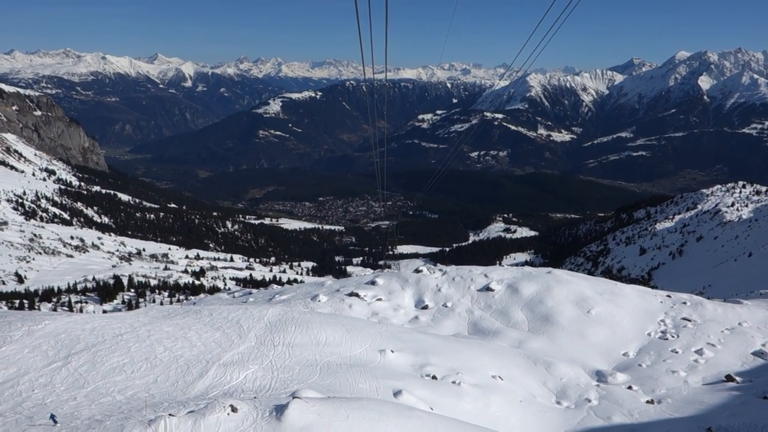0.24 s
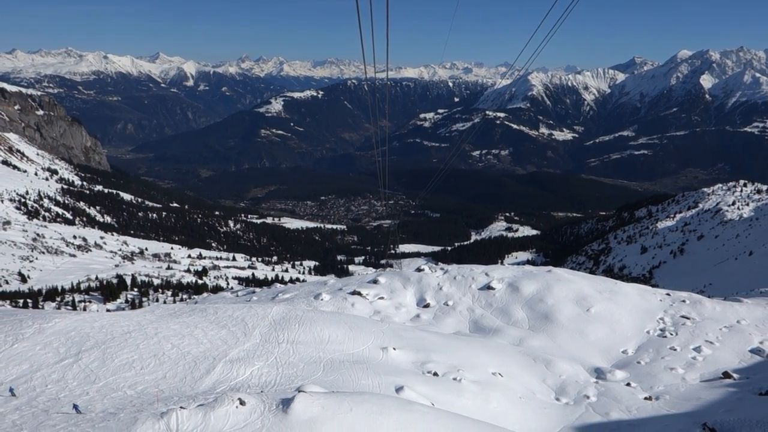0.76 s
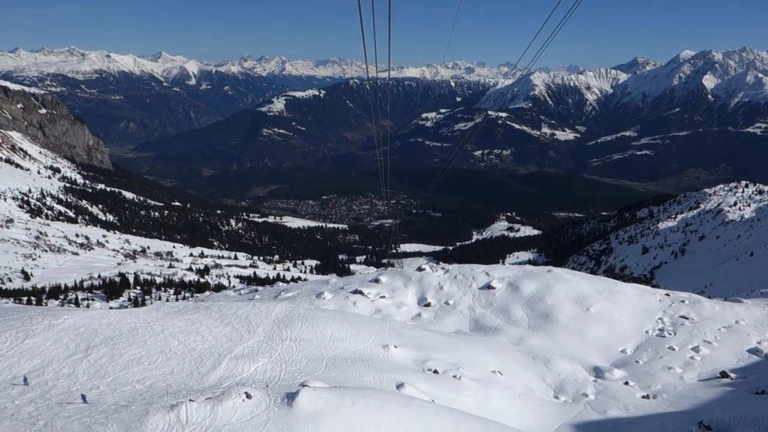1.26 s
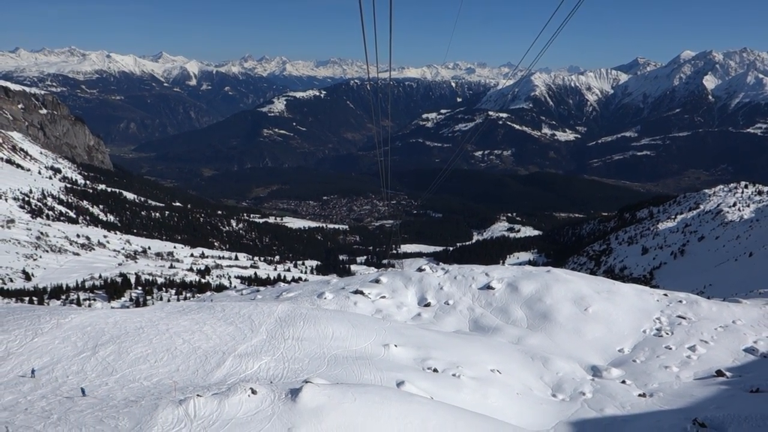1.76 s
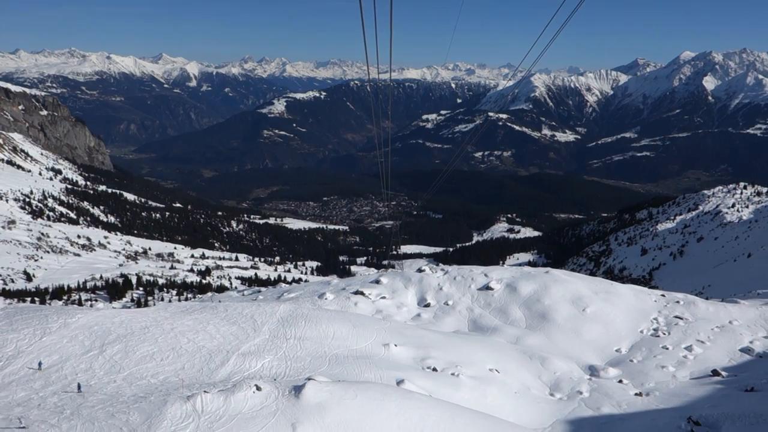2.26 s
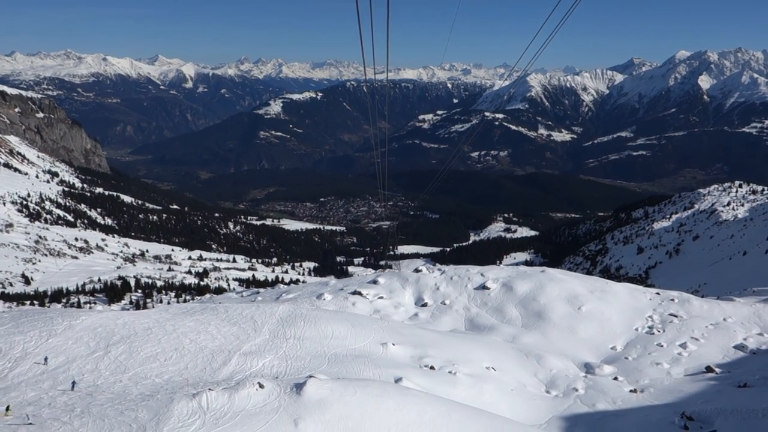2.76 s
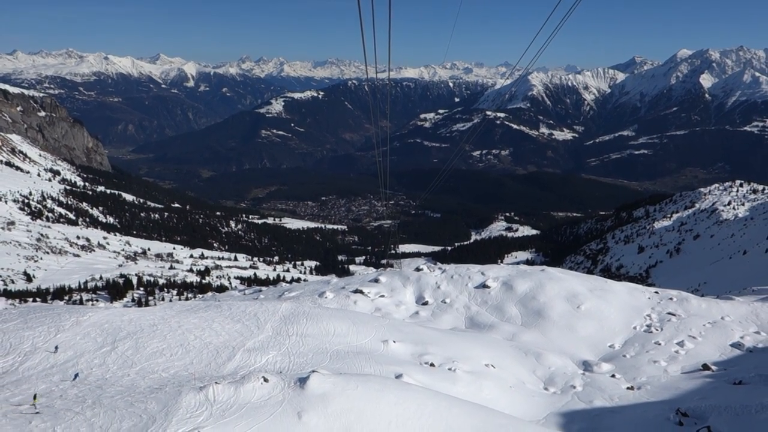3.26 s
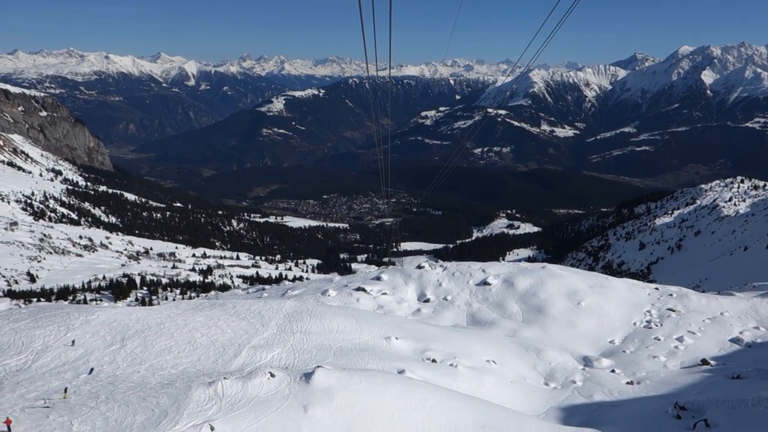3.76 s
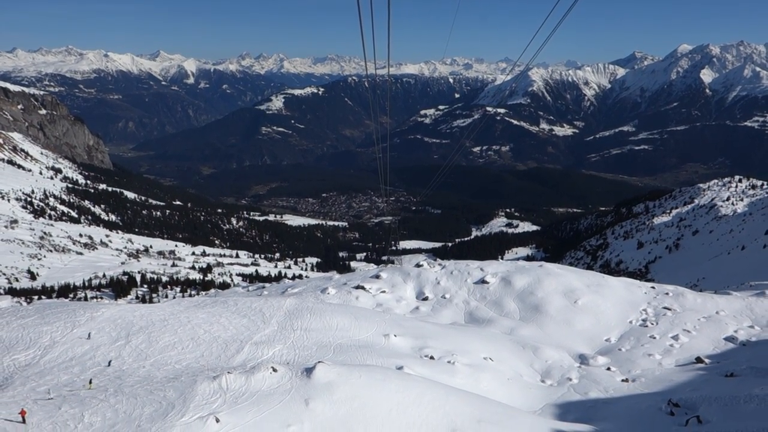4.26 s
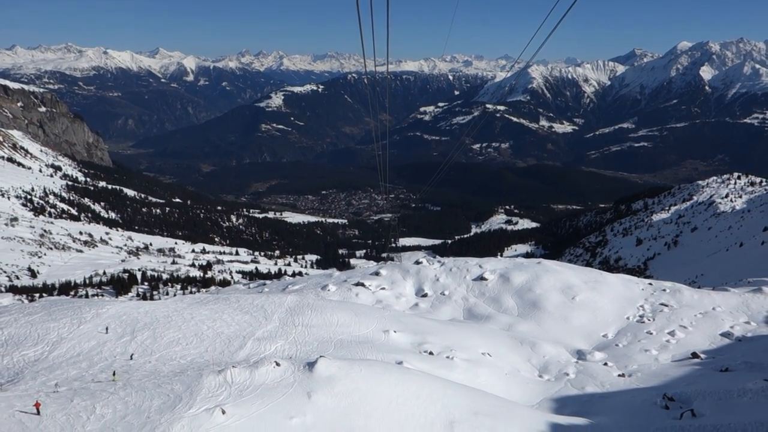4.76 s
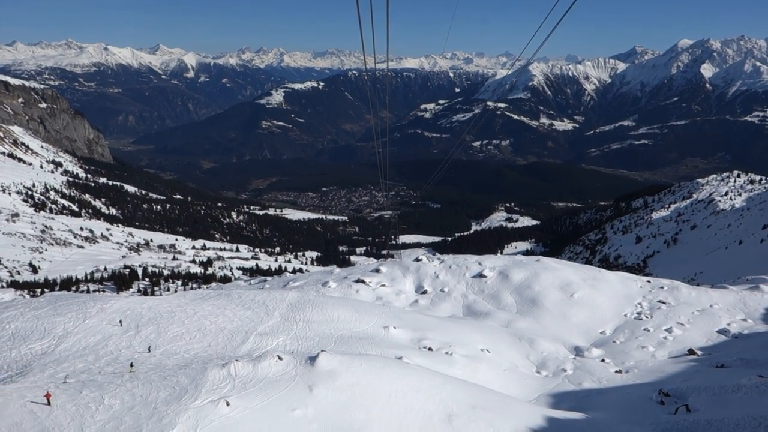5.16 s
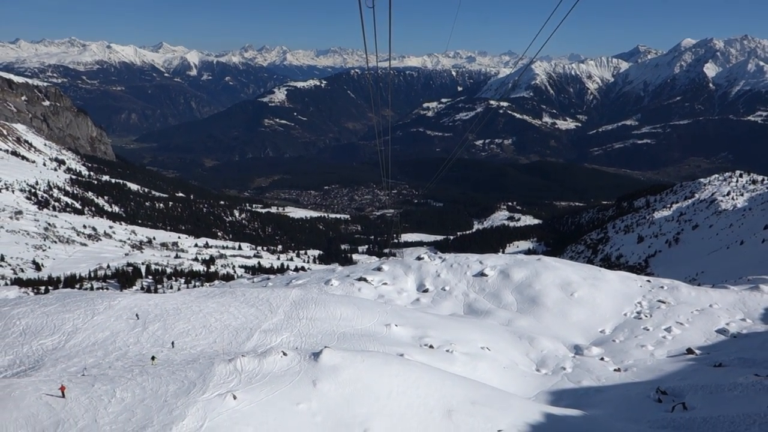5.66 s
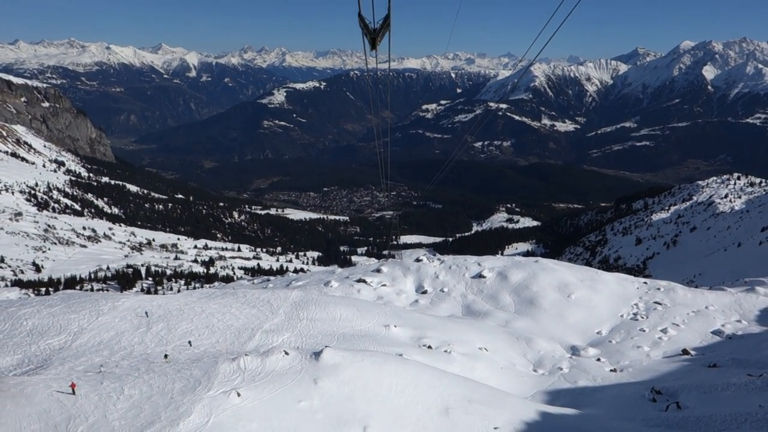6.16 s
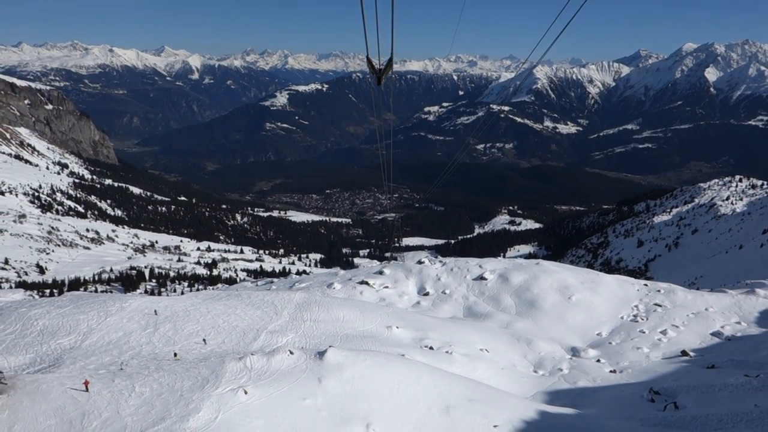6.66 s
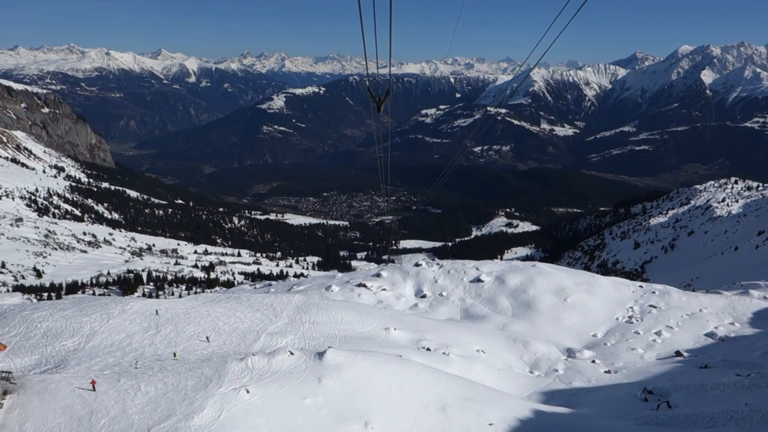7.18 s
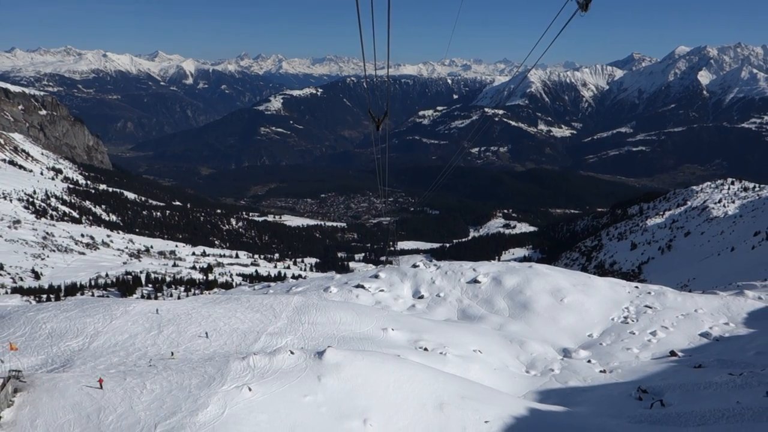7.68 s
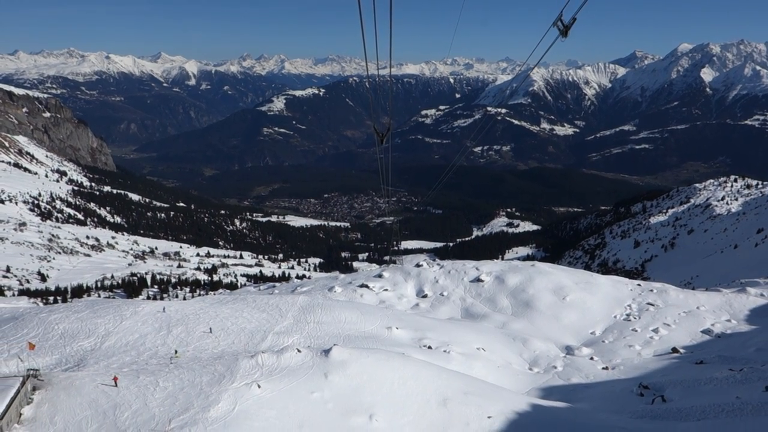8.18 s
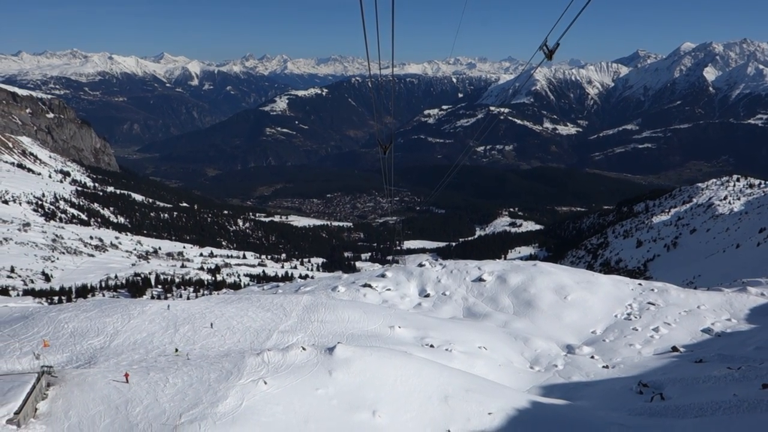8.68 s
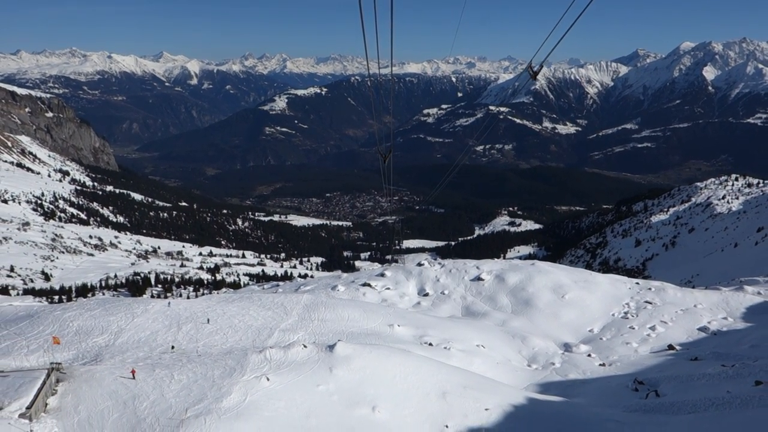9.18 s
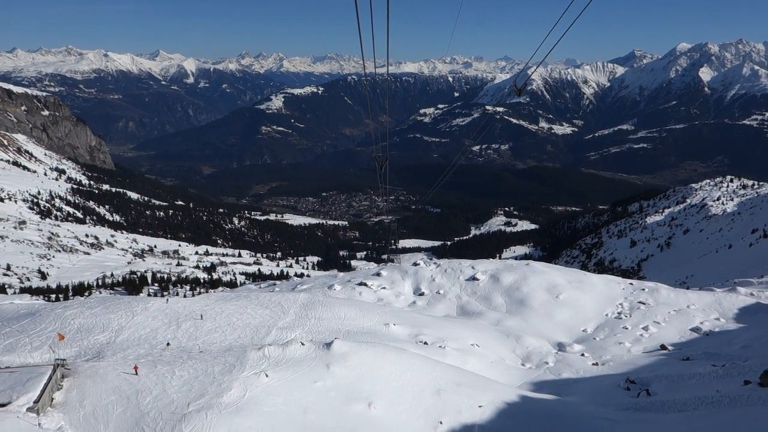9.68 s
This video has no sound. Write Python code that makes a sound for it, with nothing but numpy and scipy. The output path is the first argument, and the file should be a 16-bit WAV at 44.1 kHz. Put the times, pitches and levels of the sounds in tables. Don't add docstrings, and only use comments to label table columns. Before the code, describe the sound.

Close stereo microphones in a small enclosed cabin gliding on ropes. A dark rumble of shell and floor dominates, with quiet airy hiss from a window gap at left, occasionally ringing as wheels rub. Small plastic ticks on the right, a sharp snap on the left past six seconds. Later the low wavering drone strengthens and padded thuds come in groups, strongest at eight seconds, with one last bump near the end.

```python
import sys
import numpy as np
from scipy import signal
from scipy.fft import rfft, irfft, next_fast_len
from scipy.io import wavfile
from scipy.ndimage import uniform_filter1d, map_coordinates

SR = 44100
rng = np.random.default_rng(int(sys.argv[2]) if len(sys.argv) > 2 else 0)


def attenuation_scalar(level_db):
    decades = np.asarray(level_db, float) / 20
    return 10 ** decades


def inscribe(sig):
    pcm = np.round(np.clip(np.atleast_2d(sig).T, -1, 1) * 32767)
    wavfile.write(sys.argv[1], SR, pcm.astype(np.int16))


N = 437913
T = np.arange(N) / SR


def unit(x):
    return x / np.sqrt(np.mean(x ** 2) + 1e-20)


def along(points, hz):
    point_hz, value = np.transpose(points)
    return np.interp(np.log(hz + 1), np.log(point_hz + 1), value)


def curves(rows):
    s, *columns = np.transpose(rows)
    return [np.interp(T, s, column) for column in columns]


def wobble(knots_per_s):
    knots = rng.standard_normal(int(N * 40 / SR) + 4)
    coarse = map_coordinates(knots, [T[::64] * min(knots_per_s, 40)])
    return np.interp(T, T[::64], coarse)


def bell(t, length_s):
    return np.exp(-(2 * t / length_s) ** 2)


def filtered(x, response):
    m = next_fast_len(N + SR // 2)
    return irfft(rfft(x, m) * response(np.fft.rfftfreq(m, 1 / SR)), m)[..., :N]


def modes(table):
    def response(f):
        total = 0
        for k, (hz, width_hz, db) in enumerate(table):
            total = total + (-1) ** k * attenuation_scalar(db) * 1j * f * width_hz / (hz * hz - f * f + 1j * f * width_hz)
        return total
    return response


def ringing(noise, hz, width_hz):
    b, a = signal.iirpeak(hz, hz / width_hz, SR)
    return unit(signal.lfilter(b, a, signal.lfilter(b, a, noise)))


def rush(spectrum, patchy_db):
    shape = (513, N // 512 + 3)
    patches = uniform_filter1d(rng.standard_normal(shape), size=12, axis=0)
    patches = uniform_filter1d(patches, size=7, axis=1)
    colour_db = along(spectrum, np.fft.rfftfreq(1024, 1 / SR))[:, None]
    z = signal.stft(rng.standard_normal(N + 1024), nperseg=1024)[2][:, :shape[1]]
    z = z * attenuation_scalar(colour_db + patchy_db * unit(patches))
    return unit(signal.istft(z, nperseg=1024)[1][:N])


def add(track, s, sound):
    part = track[round(s * SR):][:len(sound)]
    part += sound[:len(part)]


def ports(x, left_db):
    lag = 4
    late = np.pad(x, (lag, 0), "edge")[:N]
    return np.array([attenuation_scalar(left_db / 2) * late, attenuation_scalar(-left_db / 2) * x])


def drum(table, top_hz):
    def response(f):
        return modes(table)(f) * f * f / (f * f + 17 ** 2) / (1 + (f / top_hz) ** 4)
    return unit(filtered(rng.standard_normal((2, N)), response))


def shell():
    # time in seconds, drive in dB.
    roughness = [(0, -35), (.4, -36.5), (.95, -33.5), (1.55, -35), (2.1, -31), (2.5, -35), (2.85, -34.5),
                 (3.4, -33.5), (4.2, -31), (4.5, -35.5), (4.8, -35), (5.8, -33), (6.15, -35), (7.25, -33),
                 (7.8, -34.5), (8.7, -32), (9.3, -34), (9.93, -35.5)]
    # frequency in Hz, width in Hz, level in dB.
    shell_modes = [(126, 11.5, -5), (141, 10.8, 0), (160.5, 13.6, 1), (181, 10, -2), (193, 10, -5),
                   (229.3, 14, -11), (242, 34, -22.5)]
    frame_modes = [(30.4, 11, 0), (50, 11, -1.5), (65.5, 8.6, 2.5), (98.1, 5.2, 4)]
    # centre in seconds, gain in dB, length in seconds.
    swings = [(.3, 5, 0.61), (.85, 4.5, 0.2), (1.85, 2, .3), (2.65, 3.5, 0.86), (3.443, 11, 0.43),
              (3.753, -0.5, .2), (5.1, 7.5, 0.43), (5.795, 1, .4), (6.872, 7.5, .35), (7.298, 3.5, 0.57),
              (8.35, 7, 0.48), (9.4, 4, 0.31)]
    rest_db = -41
    boom_db, = curves(roughness)
    sway_db = rest_db + sum(db * bell(T - s, length_s) for s, db, length_s in swings)
    boom, sway = drum(shell_modes, top_hz=325), drum(frame_modes, top_hz=150)
    boom = ports(boom[0], left_db=1.0) + attenuation_scalar(-21.5) * boom[1] * [[1], [-1]]
    sway = ports(sway[0], left_db=0.0) + attenuation_scalar(-19.5) * sway[1] * [[1], [-1]]
    return attenuation_scalar(boom_db + 3.0) * boom + attenuation_scalar(sway_db + 2.0) * sway


def hum():
    # time in seconds, pitch in Hz, level in dB.
    strand_tone = [(0, 181, -41.5), (3, 181, -37), (5.2, 181, -41), (5.65, 180, -32.5), (6.1, 181, -31.5),
                   (6.57, 181.2, -26.5), (6.86, 181.2, -29.5), (7.1, 181.6, -24), (7.7, 181.9, -25.5),
                   (8.15, 182, -25), (8.4, 182.5, -21), (9, 181.4, -24), (9.3, 182.7, -24),
                   (9.62, 182.8, -26.5), (9.83, 186.4, -21.5), (9.93, 183.5, -23)]
    # time in seconds, level change in dB.
    skips = [(5.78, -10), (5.87, -6), (6.24, -19), (6.51, -9.5), (6.8, -11), (7.76, -5), (8.08, -6),
             (8.17, -4), (8.459, -10.5), (8.67, -5), (9.01, -11.5), (9.47, -7), (9.77, 1)]
    skip_s = 0.028
    hz, db = curves(strand_tone)
    db = db + sum(change_db * bell(T - s, skip_s) for s, change_db in skips)
    phase = 2 * np.pi * np.cumsum(hz) / SR + 0.29 * wobble(7)
    waver_db = 1.2 * wobble(22) + 1.3 * wobble(8)
    tone = np.sqrt(2) * attenuation_scalar(db + waver_db) * np.sin(phase)
    return ports(tone, left_db=3.0) * attenuation_scalar(0.66 * wobble(9.6) * [[1], [-1]])


def window_gap():
    # time in seconds, flow in dB.
    draught = [(0, -59.5), (.92, -61), (1.05, -59.5), (1.65, -58), (1.9, -60), (2.3, -58.5), (2.85, -58.5),
               (3.5, -60), (3.9, -61), (4.8, -59.5), (5.6, -59.5), (6.4, -59), (7.3, -58), (7.7, -58.5),
               (8.3, -59), (8.55, -56.5), (8.9, -60), (9.93, -60)]
    # frequency in Hz, level in dB per Hz.
    roar_spectrum = [(150, -41), (230, -4.5), (383, -3.5), (500, -5.5), (590, -12.5), (655, -12.5),
                     (760, -20), (1000, -44.5), (2000, -120)]
    leak_spectrum = [(450, -41.5), (750, -2.5), (900, 2), (1290, 0.5), (1700, -1.5), (2300, -4.5),
                     (2700, -15.5), (3600, -27), (6600, -120)]
    fizz_spectrum = [(2000, -120), (2600, 2), (3800, 1), (5200, -4), (7000, -3), (10000, -11.5),
                     (14000, -17)]
    shade_spectrum = [(150, -29.5), (230, 0.5), (330, -5), (450, -14.5), (560, -25.5), (800, -28),
                      (1200, -36.5), (2200, -44.5), (3500, -57.5), (6000, -120)]
    # frequency in Hz, width in
    # Hz, level in dB.
    pane_lines = [(654, 38, 0), (940, 14, -3), (1580, 47, -1.5), (1755, 56, 0.5), (2470, 50, 0.5),
                  (3600, 120, -0.5), (4420, 35, 0)]
    # frequency in Hz, level in dB.
    right_share = [(230, -4), (330, -7.5), (450, -15.5), (650, -23.5), (1000, -26), (2000, -24.5),
                   (4000, -20.5)]
    # frequency in Hz, phase in radians.
    right_lead = [(200, .7), (450, .85), (650, 1.4), (900, 2.1), (1150, 2.45), (16000, 2.5)]
    leak_db, = curves(draught)
    gust_db = leak_db - leak_db.mean()
    roar_db = -47 + 0.73 * gust_db + 0.6 * wobble(7.8)
    fizz_db = -64.5 + 1.6 * gust_db - 0.92 * T + 0.8 * wobble(2.5)
    air = attenuation_scalar(roar_db + 6.0) * rush(roar_spectrum, patchy_db=0.56)
    air += attenuation_scalar(leak_db + 6.0 + 0.92 * wobble(8)) * rush(leak_spectrum, patchy_db=0.7)
    air += attenuation_scalar(fizz_db + 4.5) * rush(fizz_spectrum, patchy_db=2.0)

    def to_ports(f):
        whistling = np.sqrt(1 + sum(abs(modes([tone])(f)) ** 2 for tone in pane_lines))
        across = attenuation_scalar(along(right_share, f)) * np.exp(1j * along(right_lead, f))
        return whistling * np.array([1 + 0 * f, across])

    left, right = filtered(air + wheels(), to_ports)
    return np.array([left, right + attenuation_scalar(roar_db - 4.5) * rush(shade_spectrum, patchy_db=2.0)])


def wheels():
    # centre in seconds, length in seconds, level in dB, brightness in dB per octave.
    rubs = [(2.2, 0.26, -66.5, -5), (2.5, 0.18, -69, 2), (2.778, 0.31, -63.5, 1.5), (3.361, 0.18, -64, 0.5),
            (3.553, 0.22, -66.5, 3.5), (4.655, 0.16, -66.5, 3), (5.6, 0.14, -68.5, 7),
            (5.804, 0.13, -66, -3), (6.462, 0.15, -65, 1.5), (7.15, 0.09, -71.5, -10.5),
            (7.8, 0.11, -74, 10.5), (8.57, 0.19, -64, -11.5), (8.95, 0.13, -68, 6)]
    # frequency in Hz, width in Hz, level in dB.
    pane_modes = [(881, 55, -2.5), (1614, 120, 0.5), (1788, 80, -.5), (2255, 120, -3.5), (2550, 27, -8),
                  (4400, 90, -16.5), (2050, 1100, 1.5), (3500, 1500, -11)]
    out, t = np.zeros(N), T[:SR * 4 // 5] - .4
    for (s, length_s, db, bright_db), noise in zip(rubs, rng.standard_normal((len(rubs), len(t)))):
        lines = 0
        for hz, width_hz, mode_db in pane_modes:
            lines = lines + attenuation_scalar(mode_db + bright_db * np.log2(hz / 1600)) * ringing(noise, hz, width_hz)
        add(out, s + t[0], attenuation_scalar(db) * bell(t, length_s) * lines)
    puff_s, puff_db, rise_s, fade_s = 4.345, -62, 0.021, 0.08
    u = t - t[0]
    puff = ringing(rng.standard_normal(len(t)), hz=7900, width_hz=700)
    add(out, puff_s - .015, attenuation_scalar(puff_db) * (1 - np.exp(-u / rise_s)) * np.exp(-u / fade_s) * puff)
    return out * attenuation_scalar(4.5)


def jolts():
    # time in seconds, peak in dB, deep part in dB, sharp part in dB.
    blows = [(2.975, -44, 17, -18), (3.223, -23.5, 0.5, -26), (3.245, -26, 1, -25),
             (3.278, -26.5, -12, -20), (6.642, -40, -4, -8), (6.675, -33.5, 7, -19),
             (6.722, -20.5, -4, -21.5), (6.782, -29, -8, -13), (6.861, -36, 5.5, -7), (6.91, -32, 5.5, -7),
             (6.966, -32.5, -5, -16), (7.001, -25, -6.5, -19), (7.118, -32, 2.5, -17),
             (7.224, -21, -0.5, -13.5), (7.274, -22, -6.5, -11), (7.388, -33.5, 0.5, -12),
             (7.718, -40.5, 7, -15), (7.766, -25, -9.5, -25), (8.007, -25, 1, -19),
             (8.058, -13.5, 1, -14.5), (8.095, -19.5, -1, -23), (8.246, -42.5, -4, -20.5),
             (8.329, -26.5, 2.5, -23), (8.371, -23.5, 4.5, -31), (8.431, -16.5, -1, -22.5),
             (8.491, -26, 1.5, -22), (8.61, -37, -1, -16), (9.27, -38.5, 0, -11), (9.364, -25, -0.5, -20),
             (9.417, -21.5, -2.5, -15.5)]
    out, t = np.zeros((2, N)), T[:SR // 8]

    def push(hz, t60_s):
        return np.sin(2 * np.pi * hz * t) * attenuation_scalar(-60 * t / t60_s) * (1 - np.exp(-t / 0.0016))

    loose = signal.butter(4, [55, 320], "bandpass", fs=SR, output="sos")
    shudders = signal.sosfilt(loose, rng.standard_normal((len(blows), 2, len(t))))
    shudders = shudders * np.exp(-((t - .06) / 0.021) ** 2)
    detunes = rng.standard_normal((len(blows), 4))
    for (s, db, deep_db, sharp_db), (a, b, c, d), (alike, apart) in zip(blows, detunes, shudders):
        body = attenuation_scalar(db + 7) * push(250 * (1 + 0.083 * a), 0.038)
        body = body + attenuation_scalar(db + deep_db + 3.5) * push(125 * (1 + .2 * b), 0.1)
        edge = push(480 * (1 + .06 * c), .012) + attenuation_scalar(sharp_db - 4.0) * push(800, 0.006)
        edge = edge * attenuation_scalar(db + sharp_db + 17.5 + 0.42 * (db + 21.0))
        near = attenuation_scalar(db + 7.5) * push(300 * (1 + .15 * d), .035)
        add(out[0], s - .002, body + edge + near)
        add(out[1], s - .002, attenuation_scalar(-0.5) * (body + edge) - near)
        shudder_gain = attenuation_scalar(db + deep_db + 12.0)
        add(out[0], s - .05, shudder_gain * (alike + .5 * apart))
        add(out[1], s - .05, shudder_gain * (alike - .5 * apart))
    return filtered(out, lambda hz: 1 / (1 + 1j * hz / 1700) ** 3)


def clicks(table, cycles, spread):
    out, t = np.zeros(N), T[:SR // 40]
    for (s, db, hz), noise in zip(table, rng.standard_normal((len(table), len(t)))):
        b, a = signal.butter(2, [hz / spread, min(hz * spread, .45 * SR)], "bandpass", fs=SR)
        burst = unit(signal.lfilter(b, a, noise))
        add(out, s - .001, attenuation_scalar(db) * burst * np.exp(-t / (0.00076 + cycles / hz)))
    return out


def housing():
    # time in seconds, peak in dB.
    ticks = [(.229, -55), (1.249, -51), (1.402, -50), (1.433, -48), (1.678, -53), (1.858, -48),
             (2.017, -54), (2.157, -47), (2.472, -48), (2.665, -51), (2.744, -46), (3.139, -52),
             (3.294, -53), (3.42, -53), (3.79, -53.5), (4.02, -55), (4.175, -55), (5.585, -50), (5.86, -49),
             (6.14, -53), (6.837, -51), (6.906, -54), (7.068, -54), (7.422, -48), (7.701, -50),
             (8.287, -55), (8.383, -50), (8.428, -51), (9.525, -52.5), (9.597, -50)]
    # time in seconds, peak in dB, pitch in Hz.
    snaps = [(.161, -47.5, 3600), (2.29, -52, 3000), (3.315, -59, 2500), (5.56, -61, 3500),
             (5.99, -57, 4610), (8.44, -50.5, 3000), (3.299, -51, 9000), (5.545, -58.5, 4000),
             (6.328, -50, 7000), (6.57, -34.5, 13000), (6.571, -46, 2200), (6.577, -48.5, 12100),
             (6.596, -61.5, 11100), (8.598, -58, 11000)]
    tick_hz, tick_scatter = 1150, .15
    draw = rng.random((70, 3))
    faint_s = draw[:, 0] * (N / SR - .1) + .01
    faint_db = -65 - 3.5 * np.log(draw[:, 1] + .05)
    faint = np.c_[faint_s, faint_db, 800 + 900 * draw[:, 2]]
    pitched = np.c_[ticks, tick_hz * np.exp(tick_scatter * rng.standard_normal(len(ticks)))]
    right = attenuation_scalar(1.5) * clicks(pitched, cycles=3.5, spread=2.4) + clicks(faint, cycles=2.5, spread=2.2)
    right = filtered(right, lambda hz: 1 / (1 + 1j * hz / 1700))
    left = clicks(snaps, cycles=2.5, spread=1.4)
    return right * attenuation_scalar([[-9], [0]]) + left * attenuation_scalar([[0], [-22]])


def scene():
    return shell() + hum() + window_gap() + jolts() + housing()


def microphones():
    # frequency in Hz, level in dB per Hz.
    hiss_spectrum = [(300, -120), (600, 4.5), (2000, -1), (5000, -0.5), (8000, -1.5), (12000, -2),
                     (15600, -4.5), (16100, -41), (17000, -120)]
    hiss = np.array([rush(hiss_spectrum, patchy_db=1.1), rush(hiss_spectrum, patchy_db=-0.5)])
    whine_hz, whine_db = 15622, -92
    whine = np.sqrt(2) * attenuation_scalar(whine_db) * np.sin(2 * np.pi * whine_hz * T + .9 * wobble(12))
    return attenuation_scalar(-66.5) * hiss + whine


def gain_control(wet):
    duck_s, attack_s, release_s = 8.057, 0.0052, 0.051
    u = np.maximum(T - duck_s, 0)
    duck_db = -7 * (1 - np.exp(-u / attack_s)) * np.exp(-u / release_s)
    wet = wet * attenuation_scalar(duck_db)
    return wet / (1 + (abs(wet).max(axis=0) / .36) ** 5) ** .2


def band_limit(x):
    return signal.sosfilt(signal.butter(12, 16590, fs=SR, output="sos"), x)


def record(dry):
    held = gain_control(dry + microphones())
    close = np.minimum(1, (T[-1] - T) / .005)
    top_hz = 15740
    return band_limit(filtered(held * close, lambda hz: hz < top_hz))


dry = scene()
out = record(dry)
inscribe(out)
```